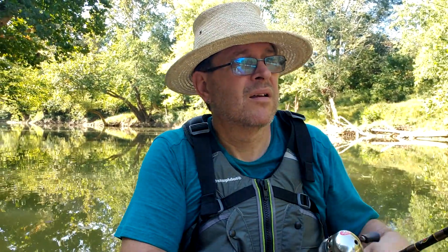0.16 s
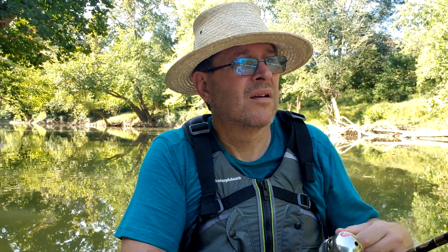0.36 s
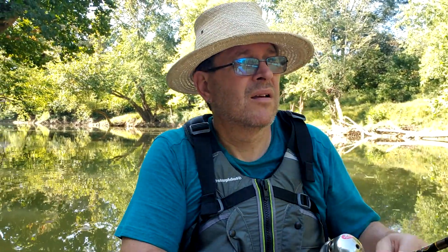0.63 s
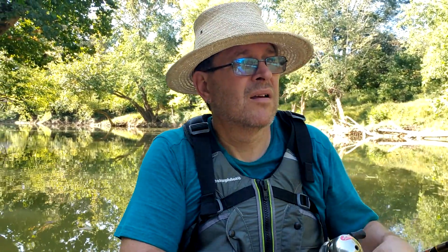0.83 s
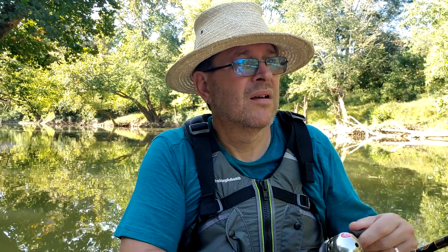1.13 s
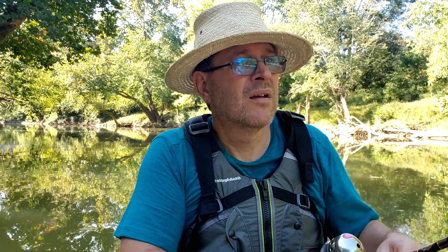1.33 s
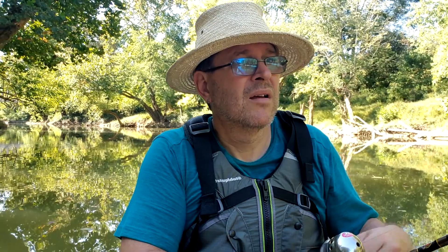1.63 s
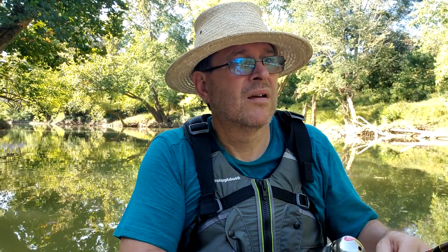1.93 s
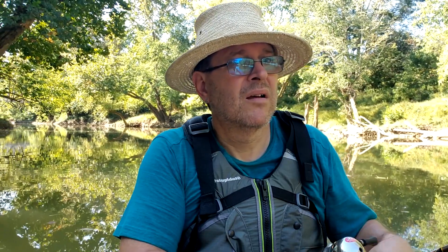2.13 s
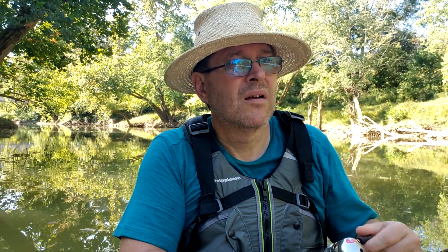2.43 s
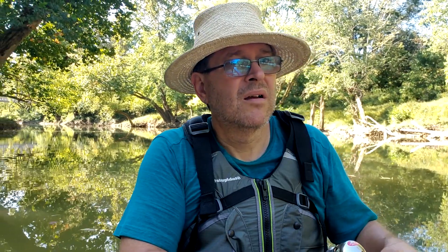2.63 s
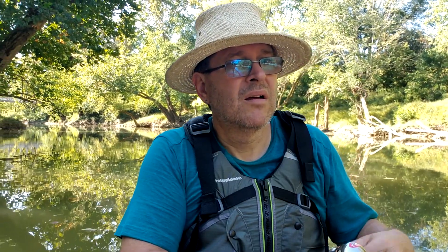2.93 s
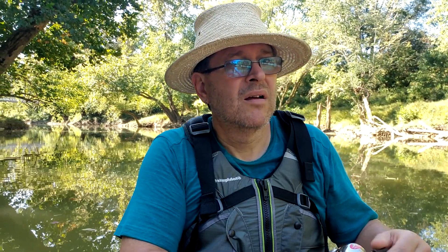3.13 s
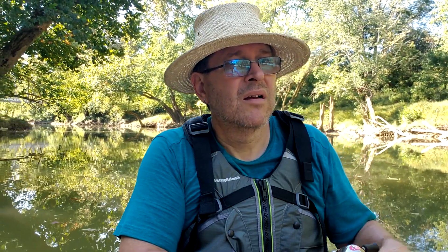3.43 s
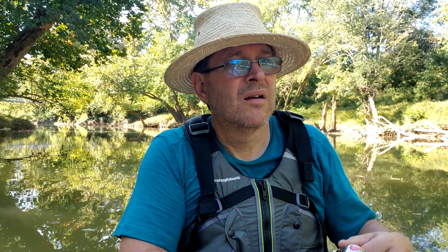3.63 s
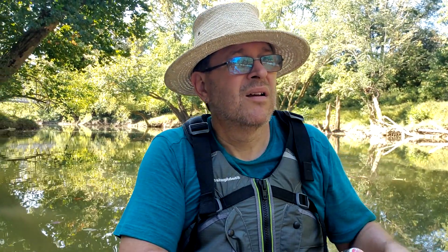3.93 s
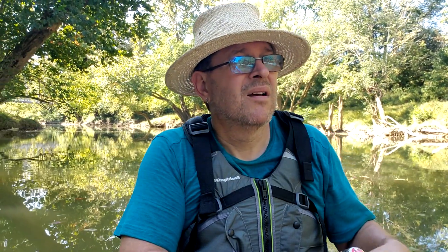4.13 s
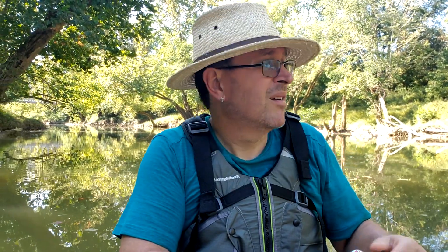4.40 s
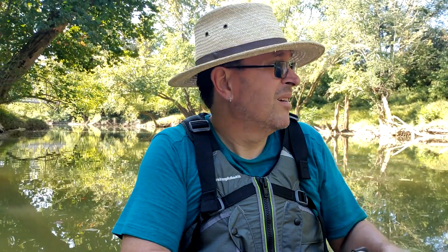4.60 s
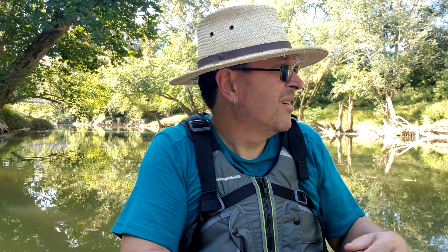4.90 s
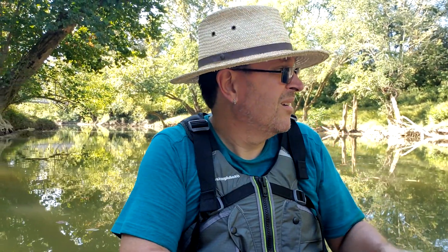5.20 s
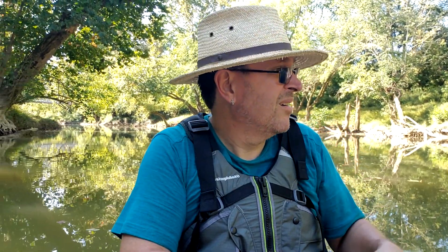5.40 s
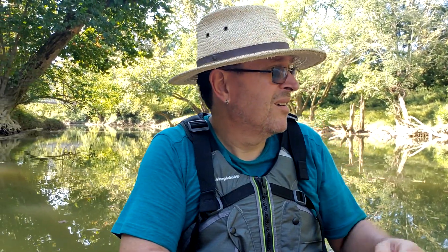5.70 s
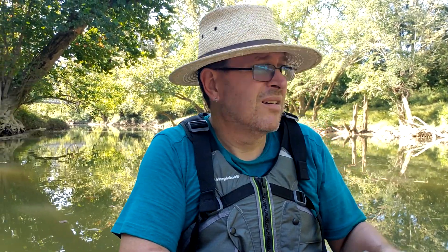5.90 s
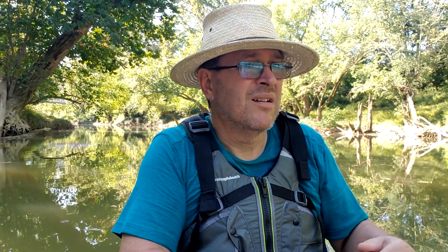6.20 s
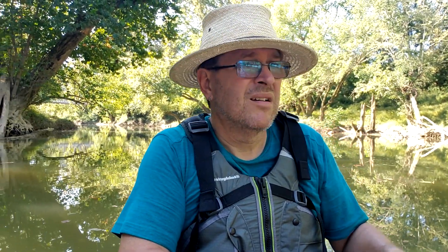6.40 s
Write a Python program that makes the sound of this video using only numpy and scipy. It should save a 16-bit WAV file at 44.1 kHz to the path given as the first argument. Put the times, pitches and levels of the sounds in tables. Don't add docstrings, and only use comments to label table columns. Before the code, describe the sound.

Outdoors by a wooded river, several close katydids on the left scrape out very high ticks that break into buzzing bursts, overlapping and stopping. A hissy far chorus pulses behind them, a thin cicada drone sits to the right, and a distant bird gives short slurred calls. Near five seconds something taps the boat hull once, softly. The stereo sound is slightly thin and grainy, with faint low rumble.

```python
import sys
import numpy as np
from scipy import signal
from scipy.fft import rfft, irfft, next_fast_len
from scipy.io import wavfile
from scipy.ndimage import uniform_filter1d, map_coordinates

SR = 44100
rng = np.random.default_rng(int(sys.argv[2]) if len(sys.argv) > 2 else 0)


def gain_from_decibels(decibels):
    exponent = np.asarray(decibels, float) / 20
    return 10 ** exponent


def pcm_store(signal):
    levels = np.round(np.clip(np.atleast_2d(signal), -1, 1) * 32767)
    wavfile.write(sys.argv[1], SR, levels.astype(np.int16).T)


N = 288855

# first wing stroke in seconds, end in seconds, rate in strokes per second, level in dB.
FAST_BUZZES = [
    (0.004, 0.5, 59.15, -34),
    (1.199, 1.82, 59.0, -34),
    (2.615, 3.235, 59.05, -33),
    (3.991, 4.635, 59.05, -32),
    (5.288, 5.93, 59.0, -32),
]
DEEP_BUZZES = [
    (0.871, 1.85, 50.35, -35),
    (3.712, 4.68, 50.1, -36),
    (5.354, 6.28, 50.15, -34),
]
SLOW_BUZZES = [
    (0.0, 0.72, 47.5, -35),
    (1.285, 2.3, 46.95, -32),
    (3.596, 4.62, 47.25, -32),
    (5.322, 6.55, 47.15, -32),
]
BRIEF_BUZZES = [
    (2.414, 3.2, 50.55, -34),
    (4.681, 4.85, 49.25, -35),
]

# first tick in seconds, last in seconds, rate in strokes per second, level in dB, growth over the run in dB.
FAST_TICKS = [
    (0.912, 1.13, 18.5, -26.5, 1.5),
    (2.391, 2.538, 20.3, -28, 2),
    (3.743, 3.946, 19.2, -26, -6.5),
    (5.027, 5.075, 20.8, -25.5, 5.5),
    (5.121, 5.221, 20.8, -24, 0.5),
    (6.368, 6.527, 19.7, -28, -7),
]
DEEP_TICKS = [
    (0.602, 0.789, 10.7, -30.5, -0.5),
    (2.561, 2.709, 14, -33, -4.5),
    (2.805, 3.164, 14.3, -30, 6),
    (3.229, 3.565, 14.8, -28.5, 3),
    (4.825, 4.945, 16.3, -30.5, -0.5),
    (5.134, 5.258, 16, -30, 4.5),
]
SLOW_TICKS = [
    (0.81, 0.86, 51, -39.5, 5.5),
    (2.32, 2.364, 21.5, -32, 6),
    (3.291, 3.307, 37, -40.5, -8),
    (3.383, 3.474, 32, -30, -1),
    (4.909, 4.93, 52, -37, 2),
    (5.008, 5.278, 7.5, -28, -2.5),
]

# centre in Hz, width in Hz, level in dB.
FAST_WING = [(12040, 1300, -2.5), (14030, 1500, 2), (15790, 1300, 0.5)]
DEEP_WING = [(9680, 2000, -7.5), (12470, 1330, 3.5), (15320, 1630, 1)]
SLOW_WING = [(12550, 700, -1.1), (14250, 800, 1), (15560, 920, -0.55)]

# time in seconds, level in dB.
CHORUS_LEVEL = [(0.0, -30.5), (0.5, -34), (1.4, -30.5), (1.9, -31), (3.06, -34), (3.4, -34), (3.92, -30.5),
                (4.3, -30.5), (4.63, -31), (4.91, -35), (5.09, -34), (5.27, -31), (5.8, -31), (6.55, -33)]
# frequency in Hz, level in dB per Hz.
CHORUS_SPECTRUM = [(5180, -54), (8800, -19.5), (10800, -10), (12800, -3.5), (15100, -1.5), (15800, -4),
                   (16500, -29.5)]
# frequency in Hz, level in dB per Hz.
TYMBAL_SPECTRUM = [(3710, -81), (6300, -33), (6380, -18.5), (7230, 2), (7580, 5), (7960, 3.5), (8530, -5),
                   (9000, -13.5), (11700, -30), (19800, -120)]
# start in seconds, length in seconds, level in dB, top note in Hz, lowest note at the end in Hz.
BIRD_CALLS = [
    (-.15, 0.18, -59.5, 4560, 3830),
    (0.52, 0.17, -54.5, 4410, 3283),
    (1.09, 0.25, -58, 4127, 3377),
    (1.805, 0.19, -54.5, 4300, 3020),
    (2.699, .42, -66.5, 5570, 4944),
    (2.952, 0.145, -55, 4403, 3405),
    (4.056, 0.042, -66, 3570, 3040),
    (4.673, .16, -52.5, 4610, 3295),
    (5.431, .13, -58, 4357, 3507),
    (6.196, 0.15, -59.5, 4060, 3753),
]
# time in seconds, peak level in dB.
HULL_TAPS = [
    (5.013, -44.5),
]
# centre in Hz, width in Hz, level in dB.
HULL_MODES = [(680, 110, -7.5), (1005, 320, -1.5), (1316, 410, 1), (1820, 800, -2.5), (2320, 520, -5.5)]
# centre in Hz, width in Hz, level in dB.
CRICKET_MODES = [(6170, 70, -6.5), (6317, 45, 0), (6535, 90, 1)]
# frequency in Hz, level in dB per Hz.
AIR_SPECTRUM = [(15, -15), (25, -12.5), (69, 2), (242, -10), (297, -10.5), (382, -12), (947, -15),
                (1390, -17), (2200, -15.5), (5700, -18), (7410, -41), (12500, -120)]
# frequency in Hz, left minus right in dB.
AIR_LEFT_RIGHT = [(60, 1), (400, 0), (1300, 1.5), (2400, 7.5), (5000, -3)]
# frequency in Hz, gain in dB.
RIGHT_PORT_TONE = [(9000, 0), (12500, 1.5), (14000, -1.5), (15800, -1.5)]
# frequency in Hz, left in dB, right in dB.
STEP_MARGINS = [(300, -2, -1), (1000, 3, 9), (2500, 6, 17), (5600, 11, 15), (6550, 11, 12), (7000, -1, -1),
                (9000, 5, 5), (12000, -10, -10)]


def unit(x):
    return x / np.sqrt(np.mean(x ** 2) + 1e-20)


def along(points, hz):
    f, v = np.transpose(points)
    return np.interp(np.log(hz + 1), np.log(f + 1), v)


def curve(rows):
    return np.interp(np.arange(N) / SR, *np.transpose(rows))


def wobble(rate):
    knots = rng.standard_normal(int(N * rate / SR) + 4)
    return map_coordinates(knots, [np.arange(N) * rate / SR])


def filtered(x, response):
    m = next_fast_len(x.shape[-1] + SR // 2)
    spectrum = rfft(x, m) * response(np.fft.rfftfreq(m, 1 / SR))
    return irfft(spectrum, m)[..., :x.shape[-1]]


def resonances(modes):
    def response(f):
        total = 0
        for k, (centre, width, db) in enumerate(modes):
            damping = 1j * f * width
            total = total + (-1) ** k * gain_from_decibels(db) * damping / (centre * centre - f * f + damping)
        return total
    return response


def echoes(x, t60, wet_db):
    t = np.arange(int(t60 * SR)) / SR
    tail = rng.standard_normal((2, len(t))) * gain_from_decibels(-60 * t / t60)
    tail *= gain_from_decibels(wet_db) / np.linalg.norm(tail, axis=1, keepdims=True)
    tail[:, 0] = 1
    tail /= np.hypot(1, gain_from_decibels(wet_db))
    return signal.fftconvolve(x[None], tail, axes=1)[:, :len(x)]


def panned(x, pan_db):
    return x * gain_from_decibels([[0], [-pan_db]])


def teeth(rate, scatter_db):
    hits = (rng.random(N) < rate / SR) * rng.choice([-1, 1], N)
    return unit(hits * gain_from_decibels(scatter_db * rng.standard_normal(N)))


def tick_runs(runs):
    scatter_s, scatter_db = .002, 1.0
    ticks = []
    for first, last, rate, db, growth_db in runs:
        u = np.linspace(0, 1, round((last - first) * rate) + 1)
        late, loud = rng.standard_normal((2, 16))[:, :len(u)]
        times = first + (last - first) * u + scatter_s * late
        levels = db + growth_db * (u - .5) + scatter_db * loud
        ticks += zip(times, levels)
    return ticks


def katydid(buzzes, ticks, wing, level_db, pan_db, duty, swell_db, tick_s, tick_db):
    t = np.arange(N) / SR + .004
    duty = np.clip(duty, .2, 1)
    stroke = np.zeros(N)
    uneven_db = .8 * wobble(30)
    for start, end, rate, db in buzzes:
        cycles = (t - start) * rate + .5
        phase = np.clip((cycles % 1 - .5) / duty, -.5, .5)
        shape = np.cos(np.pi * phase) / np.sqrt(duty / 2)
        on = (cycles > 0) & (cycles < np.round((end - start) * rate + .5))
        swell = swell_db * np.exp(-np.abs(t - start) / 0.18)
        stroke += on * shape * gain_from_decibels(db + level_db - swell + uneven_db)
    for s, db in tick_runs(ticks):
        near = slice(*np.searchsorted(t, [s - tick_s / 2, s + tick_s / 2]))
        stroke[near] += gain_from_decibels(db + tick_db) * np.cos(np.pi * (t[near] - s) / tick_s)

    def wing_response(f):
        low_cut = f ** 4 / (f ** 4 + 10300.0 ** 4)
        return resonances(wing)(f) * low_cut

    scrape = unit(filtered(teeth(4500, 2.5), wing_response))
    return panned(echoes(stroke * scrape, t60=.035, wet_db=10.5), pan_db)


def katydids():
    near = katydid(FAST_BUZZES, FAST_TICKS, FAST_WING, level_db=-3.0, pan_db=5.0, duty=0.68,
                   swell_db=2.0, tick_s=.024, tick_db=-6.0)
    near += katydid(DEEP_BUZZES, DEEP_TICKS, DEEP_WING, level_db=-1.0, pan_db=29, duty=0.39,
                    swell_db=5.5, tick_s=0.018, tick_db=-1.0)
    near += katydid(SLOW_BUZZES, SLOW_TICKS, SLOW_WING, level_db=-2.5, pan_db=17.5, duty=.66,
                    swell_db=5.0, tick_s=.016, tick_db=-1.5)
    near += katydid(BRIEF_BUZZES, [], SLOW_WING, level_db=-5.0, pan_db=21, duty=0.93,
                    swell_db=-4.5, tick_s=.02, tick_db=0)
    noise = rng.standard_normal((2, N))
    far = unit(filtered(noise, lambda f: gain_from_decibels(along(CHORUS_SPECTRUM, f))))
    pulsing = gain_from_decibels(0.82 * np.array([wobble(40), wobble(40)]) + 0.41 * wobble(8))
    chorus = gain_from_decibels(curve(CHORUS_LEVEL) + 0.5) * pulsing * far
    return gain_from_decibels(4.5) * near + panned(chorus, 3.2)


def cicadas():
    crowd = np.array([teeth(9000, 1.0), teeth(9000, 1.66)])
    drone = unit(filtered(crowd, lambda f: gain_from_decibels(along(TYMBAL_SPECTRUM, f))))
    return panned(gain_from_decibels(-46.5 + 0.54 * wobble(20)) * drone, -4.0)


def bird():
    shake_opens = .68
    burr_db = 2.5
    lead = SR // 2
    t = np.arange(N + lead) / SR - .5
    call = np.zeros(len(t))
    shake_hz = np.resize(95 + 40 * wobble(60), len(t))
    shake = np.sin(2 * np.pi * np.cumsum(shake_hz) / SR)
    burr = gain_from_decibels(burr_db * np.resize(wobble(35), len(t)))
    for s, length, db, top_hz, end_hz in BIRD_CALLS:
        low_hz = top_hz - shake_opens * (top_hz - end_hz)
        u = np.clip((t - s) / length, 0, 1)
        top = top_hz - .3 * (top_hz - end_hz) * u ** 3.5
        low = low_hz + (end_hz - low_hz) * u
        pitch = top - (top - low) * ((1 - shake) / 2) ** 1.5
        swell = np.sin(np.pi * u) ** 0.4 * (1 + 0.068 * shake)
        call += gain_from_decibels(db) * burr * swell * np.sin(2 * np.pi * np.cumsum(pitch) / SR)
    trunks = echoes(call, t60=.12, wet_db=4.5)
    woods = gain_from_decibels(-6.5) * echoes(call, t60=1.0, wet_db=65)
    return gain_from_decibels(-11.5) * panned((trunks + woods)[:, lead:], -12.0)


def tap():
    blow = np.zeros(N)
    for s, db in HULL_TAPS:
        blow[round(s * SR)] = gain_from_decibels(db + 31.5)
    knock = filtered(blow, resonances(HULL_MODES))
    return panned(echoes(knock, t60=.09, wet_db=12.5), 1.0)


def crickets():
    trill = filtered(rng.standard_normal((2, N)), lambda f: resonances(CRICKET_MODES)(f) ** 2)
    pulsing = gain_from_decibels(-65 + 3 * wobble(15))
    return panned(pulsing * unit(trill), 2.1)


def air():
    a, b = rng.standard_normal((2, N))

    def shared(f):
        return 0.8 / (1 + (f / 120) ** 2) * f / (f + 30)

    def separate(f):
        return np.sqrt(1 - np.clip(shared(f), 0, .99) ** 2)

    def colour(f):
        return gain_from_decibels(along(AIR_SPECTRUM, f) + np.outer([.5, -.5], along(AIR_LEFT_RIGHT, f)))

    pair = np.array([a, filtered(a, shared) + filtered(b, separate)])
    breeze = gain_from_decibels(.4 * wobble(6))
    return gain_from_decibels(-67 + 1.5) * breeze * unit(filtered(pair, colour))


def dropouts(x):
    hop, shift, band = 1024, 1933, 8
    top_hz = 15735
    silent_hz, silent_width_hz, silent_db = 5915, 195, 22
    n, k = np.arange(2 * hop) + .5, np.arange(hop) + .5
    line_hz = k * SR / (2 * hop)
    window = np.sqrt(2 / hop) * np.sin(np.pi * n / (2 * hop))
    basis = window[:, None] * np.cos(np.pi / hop * np.outer(n + hop / 2, k))
    blocks = np.pad(x, ((0, 0), (shift, 2 * hop + (-N - shift) % hop))).reshape(2, -1, hop)
    lines = np.concatenate([blocks[:, :-1], blocks[:, 1:]], axis=2) @ basis

    smooth_power = uniform_filter1d(lines ** 2, size=9, axis=2)
    usual = np.sqrt(np.median(smooth_power, axis=1, keepdims=True) + 1e-20)
    f, *margins = np.transpose(STEP_MARGINS)
    margin_db = np.array([np.interp(line_hz, f, m) for m in margins])[:, None]
    margin_db = margin_db + silent_db * np.exp(-((line_hz - silent_hz) / silent_width_hz) ** 4)
    tiles = rng.standard_normal((2, lines.shape[1], hop // band))
    tiles = uniform_filter1d(tiles, size=2, axis=1)
    tiles = unit(uniform_filter1d(tiles, size=2, axis=2))
    scatter = np.repeat(tiles, band, axis=2)
    masked = np.sqrt(np.abs(uniform_filter1d(lines ** 2, size=25, axis=2))) * (k < 270)
    step = np.maximum(usual * gain_from_decibels(margin_db), masked * gain_from_decibels(3)) * gain_from_decibels(3 * scatter)

    rounded = np.round(lines / step) * step * (line_hz < top_hz)
    frames = rounded @ basis.T
    joined = frames[:, 1:, :hop] + frames[:, :-1, hop:]
    return joined.reshape(2, -1)[:, shift - hop:shift - hop + N]


def scene():
    return katydids() + cicadas() + bird() + tap() + crickets() + air()


def top_cut(x):
    return signal.sosfilt(signal.butter(12, 17090, fs=SR, output="sos"), x)


def record(dry):
    ports = filtered(dry, lambda f: gain_from_decibels(np.outer([0, 1], along(RIGHT_PORT_TONE, f))))
    mix = dropouts(ports)
    return top_cut(mix)


dry = scene()
out = record(dry)
pcm_store(out)
```